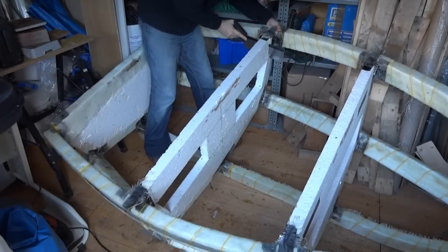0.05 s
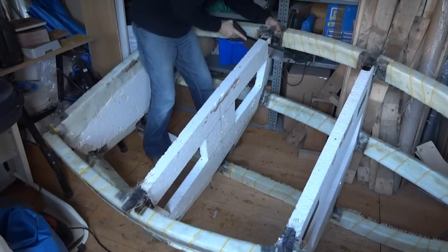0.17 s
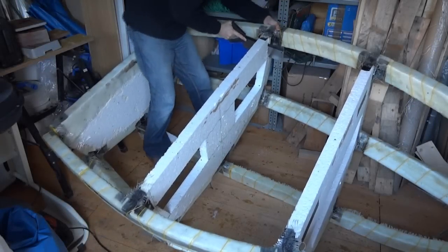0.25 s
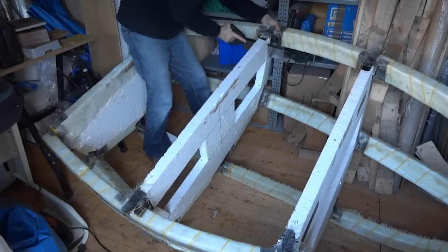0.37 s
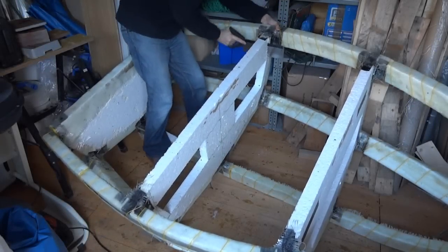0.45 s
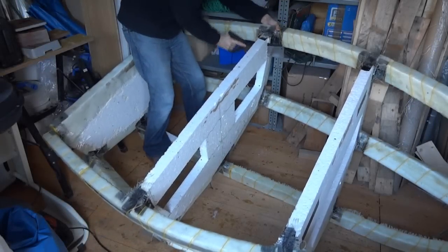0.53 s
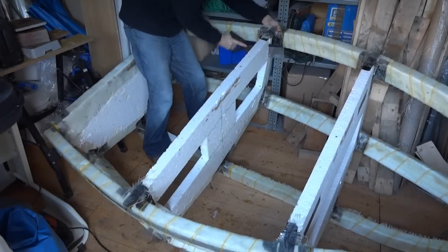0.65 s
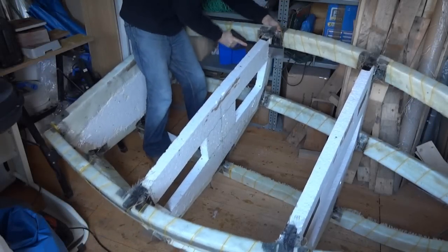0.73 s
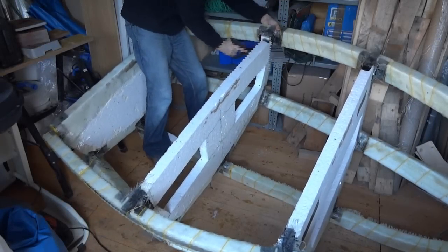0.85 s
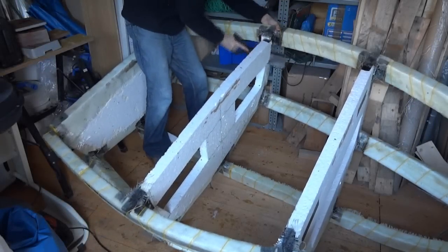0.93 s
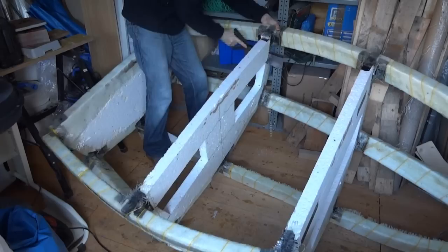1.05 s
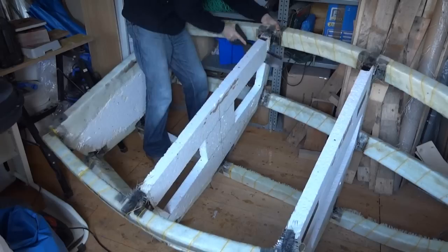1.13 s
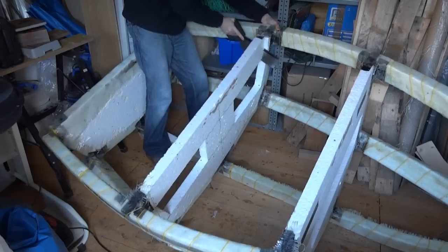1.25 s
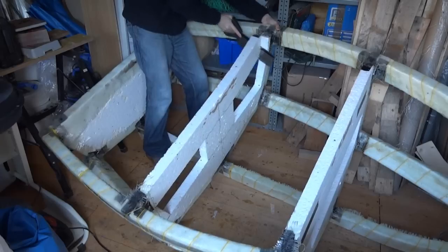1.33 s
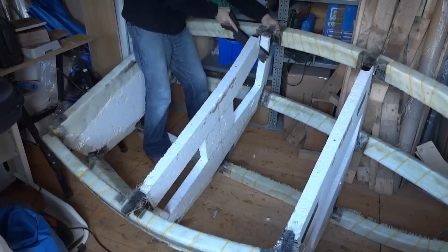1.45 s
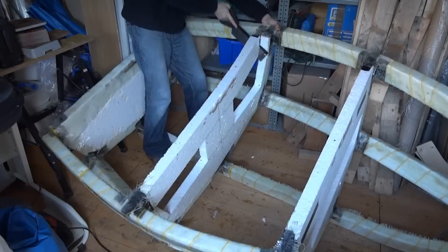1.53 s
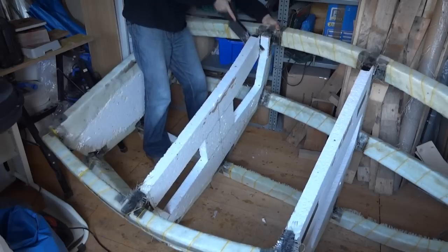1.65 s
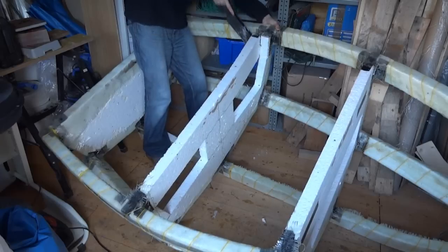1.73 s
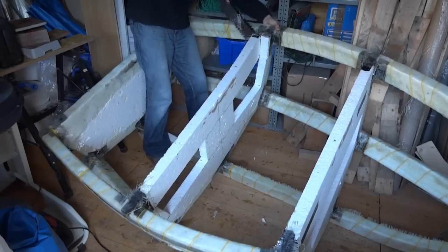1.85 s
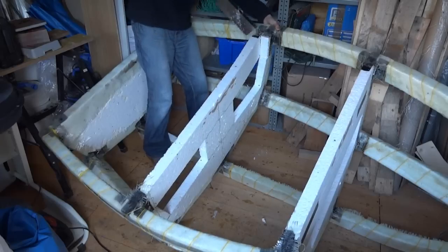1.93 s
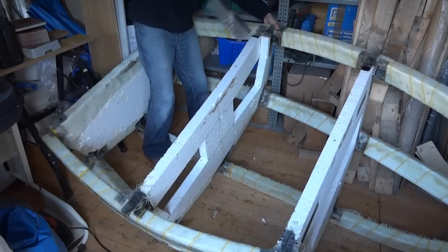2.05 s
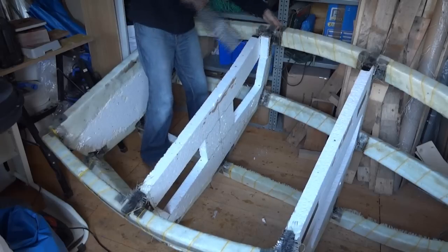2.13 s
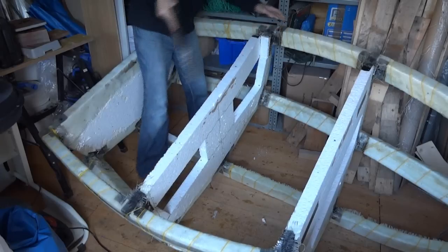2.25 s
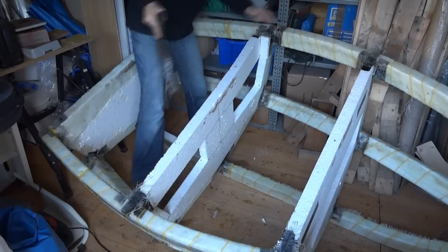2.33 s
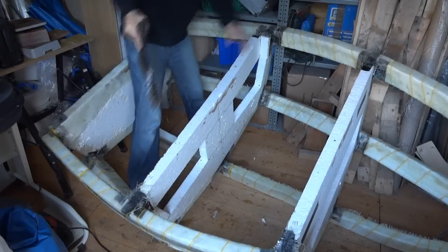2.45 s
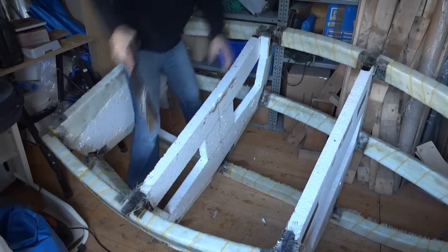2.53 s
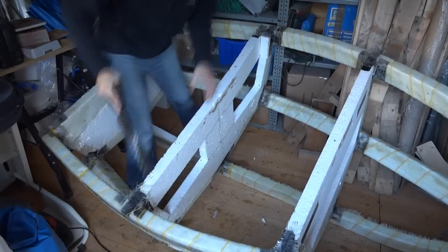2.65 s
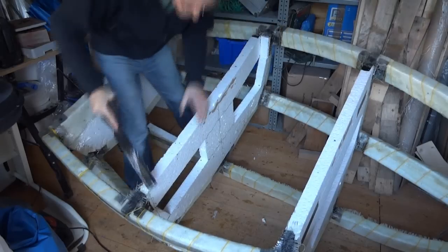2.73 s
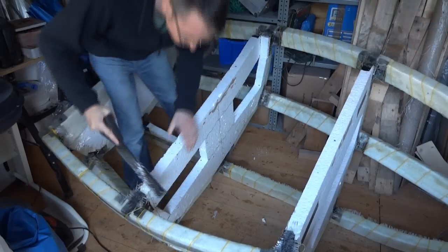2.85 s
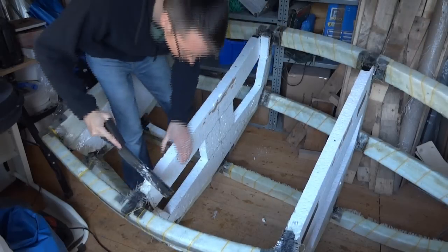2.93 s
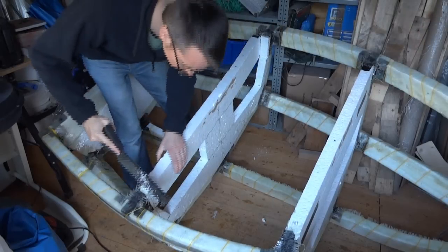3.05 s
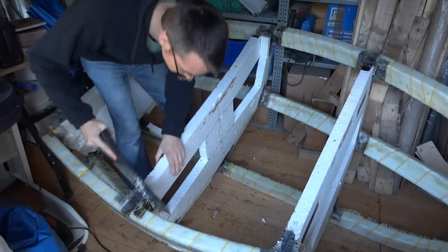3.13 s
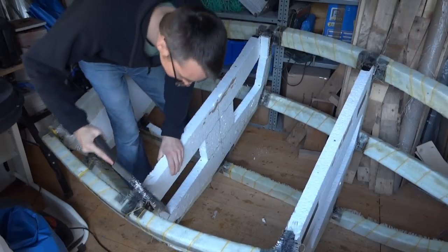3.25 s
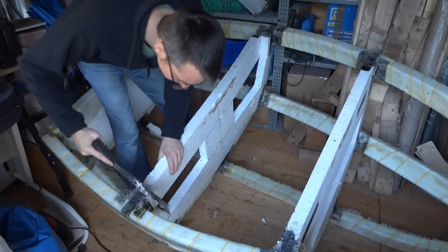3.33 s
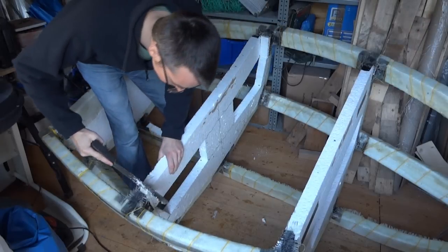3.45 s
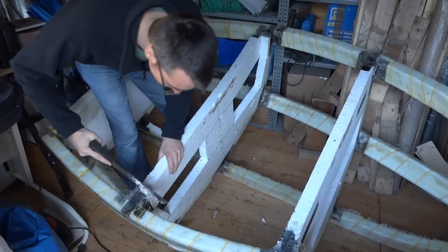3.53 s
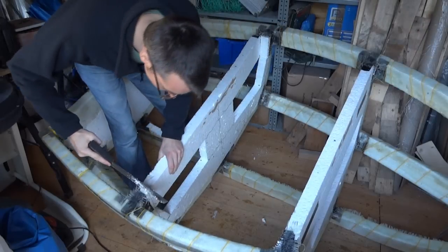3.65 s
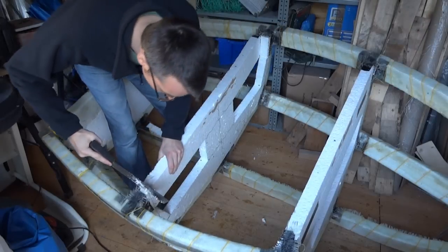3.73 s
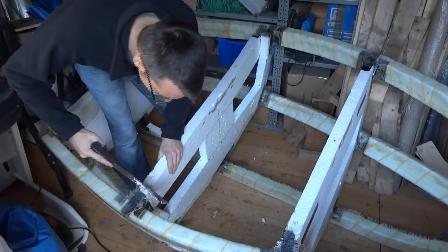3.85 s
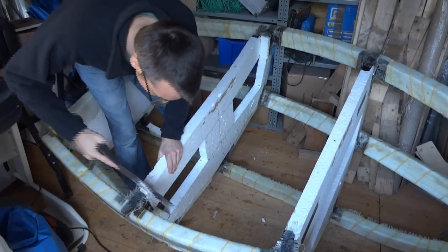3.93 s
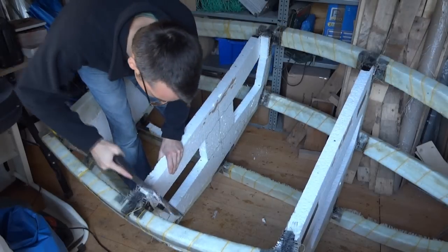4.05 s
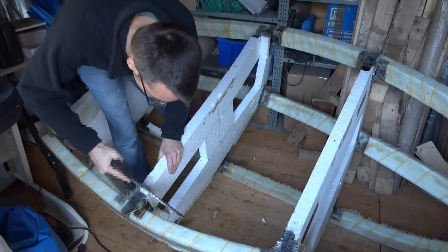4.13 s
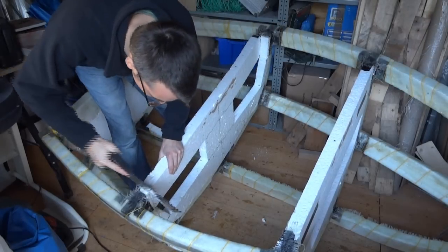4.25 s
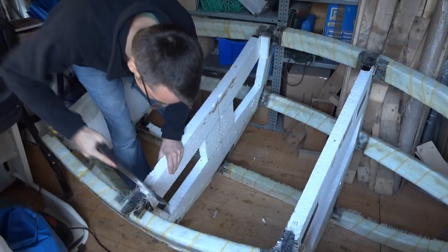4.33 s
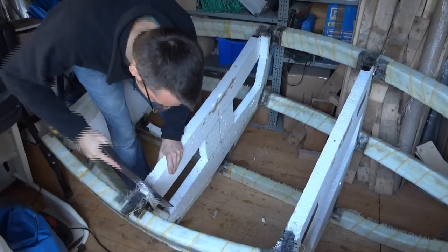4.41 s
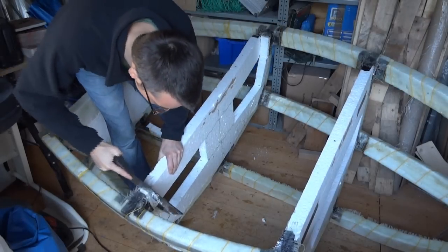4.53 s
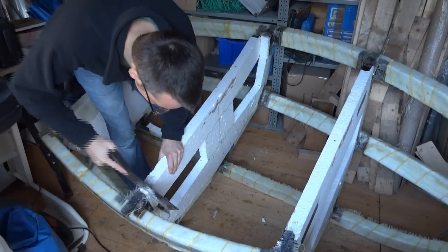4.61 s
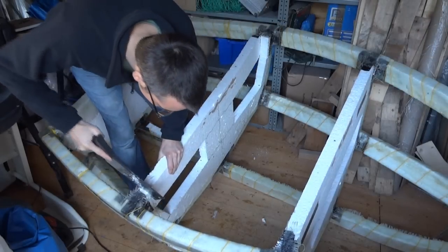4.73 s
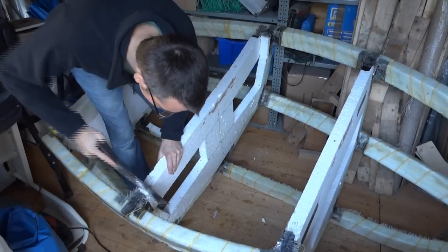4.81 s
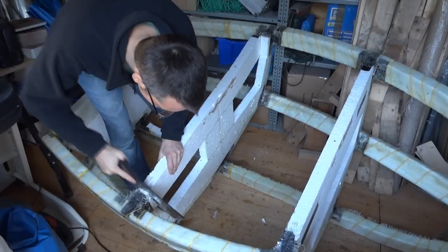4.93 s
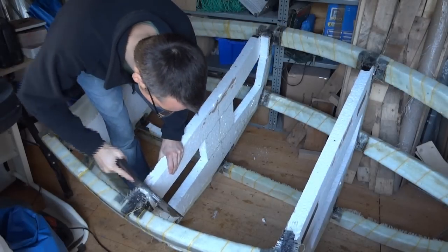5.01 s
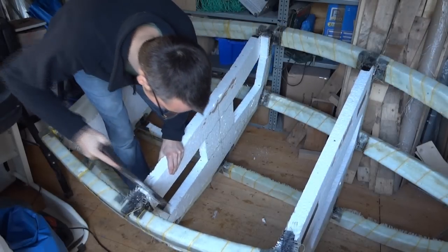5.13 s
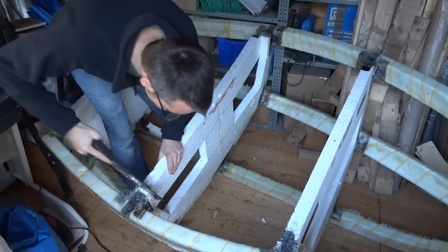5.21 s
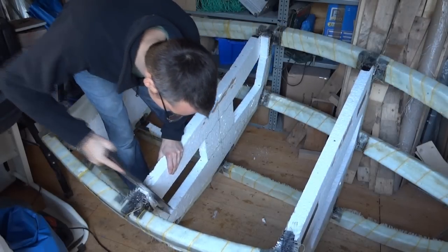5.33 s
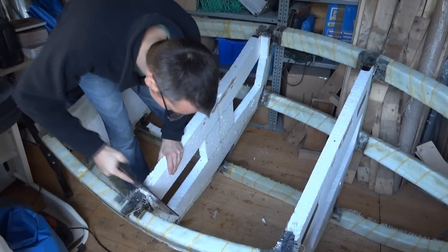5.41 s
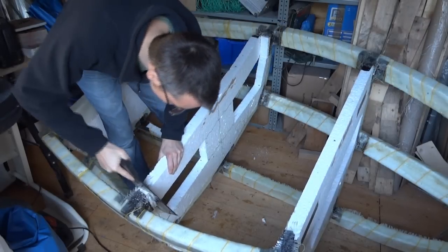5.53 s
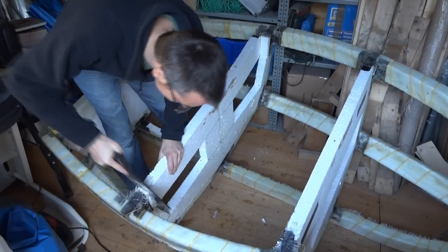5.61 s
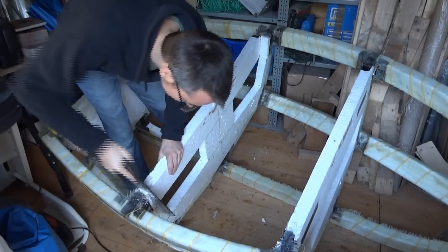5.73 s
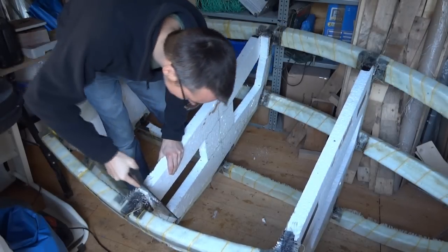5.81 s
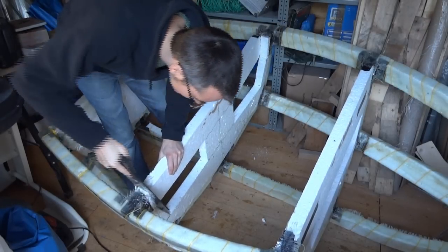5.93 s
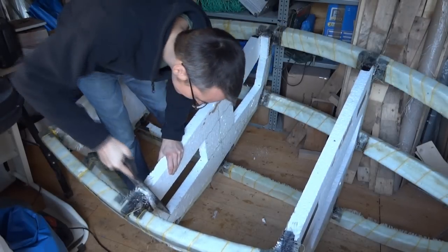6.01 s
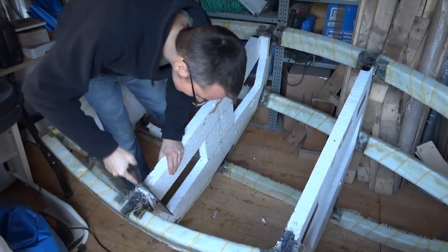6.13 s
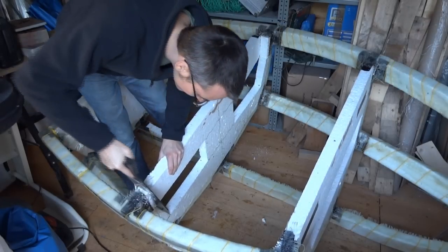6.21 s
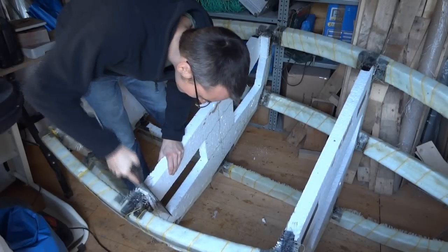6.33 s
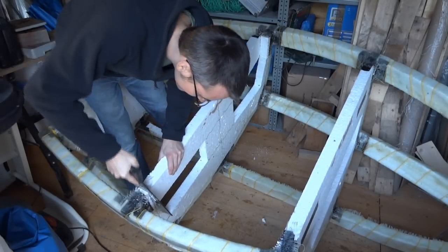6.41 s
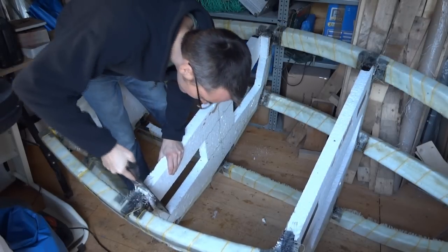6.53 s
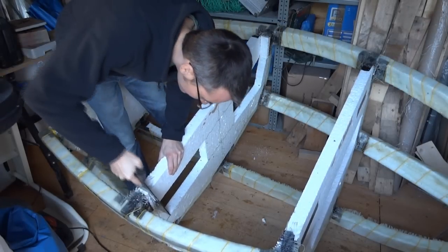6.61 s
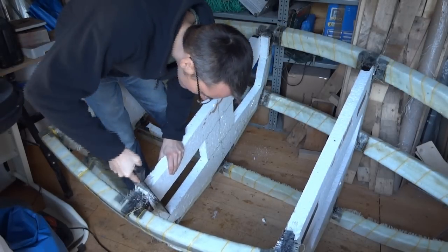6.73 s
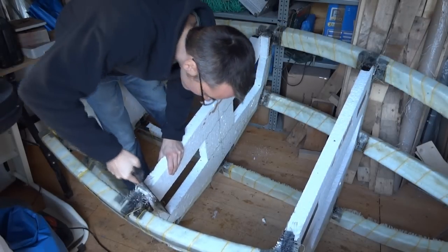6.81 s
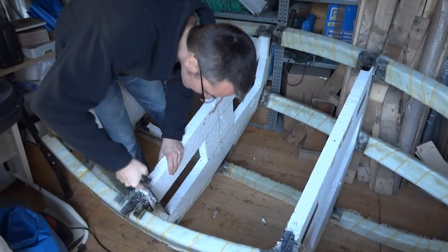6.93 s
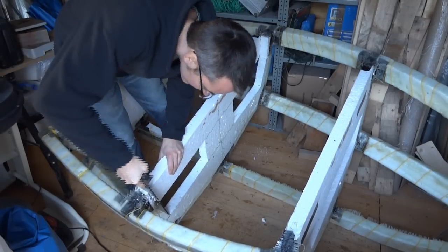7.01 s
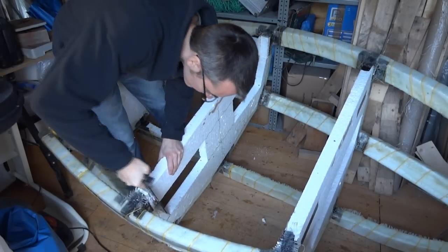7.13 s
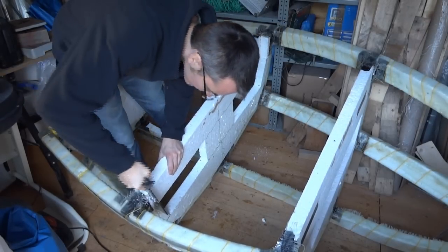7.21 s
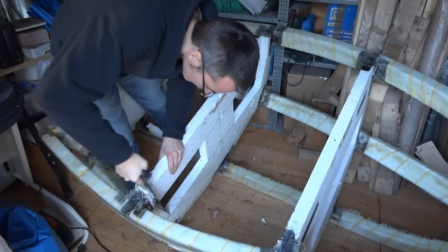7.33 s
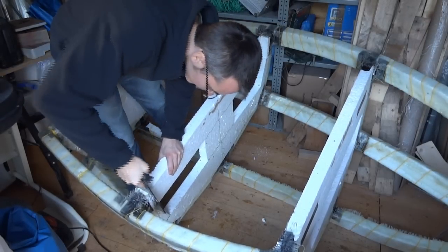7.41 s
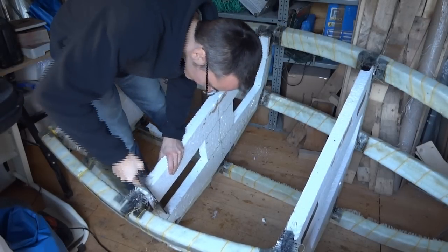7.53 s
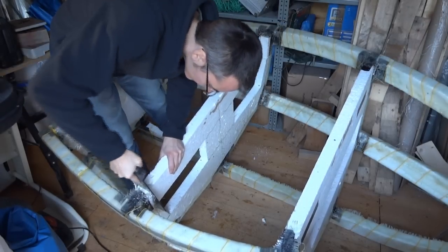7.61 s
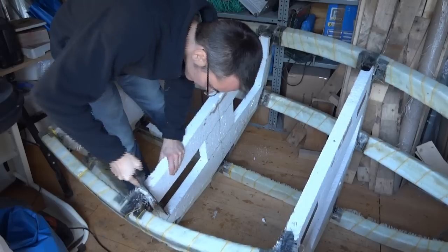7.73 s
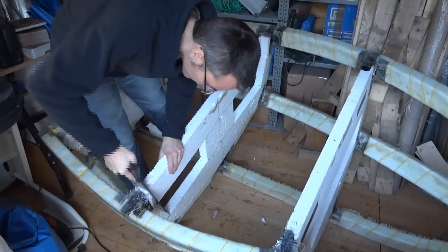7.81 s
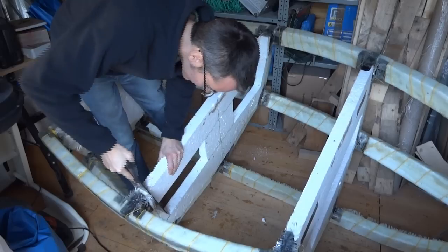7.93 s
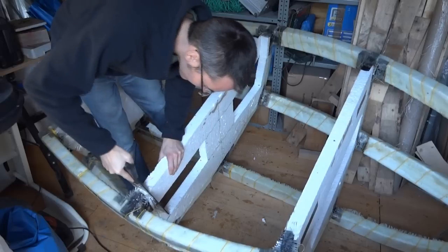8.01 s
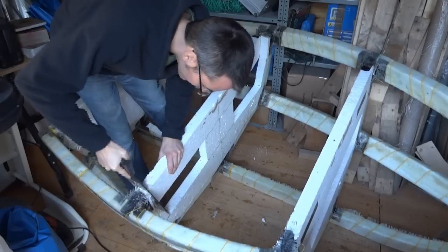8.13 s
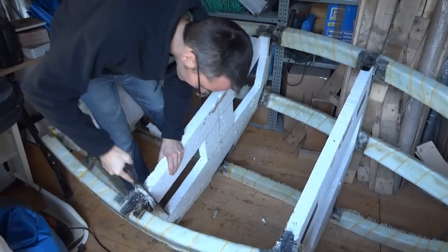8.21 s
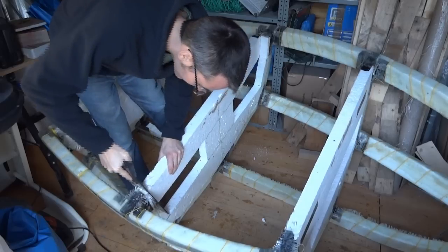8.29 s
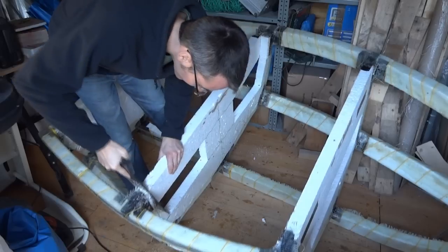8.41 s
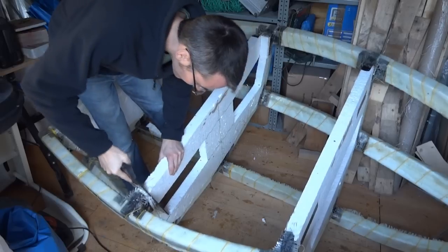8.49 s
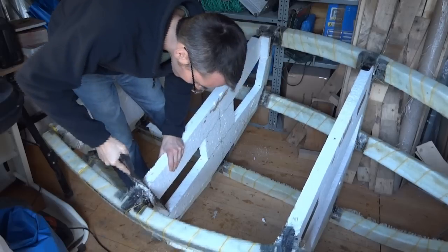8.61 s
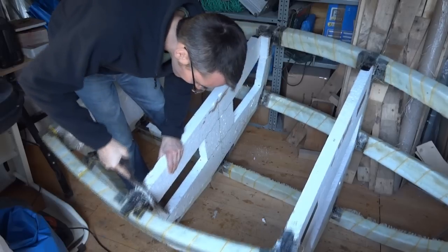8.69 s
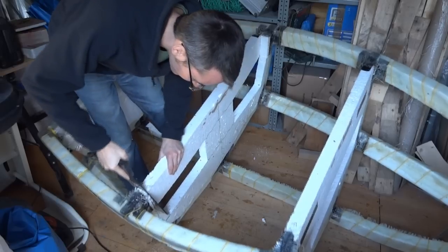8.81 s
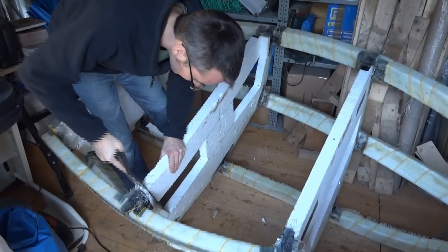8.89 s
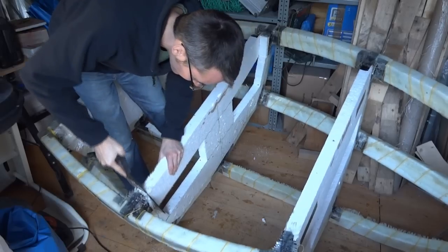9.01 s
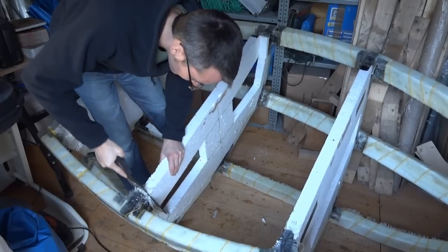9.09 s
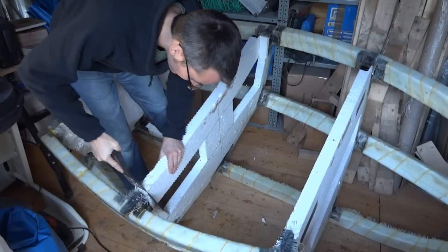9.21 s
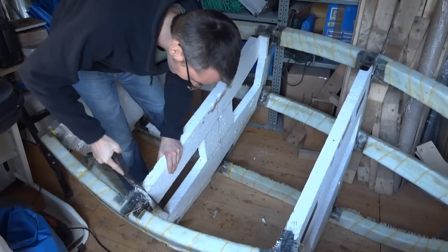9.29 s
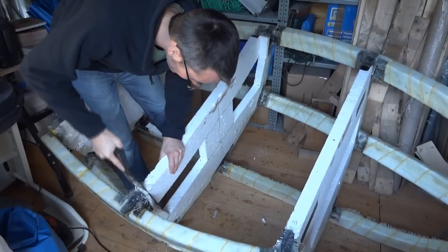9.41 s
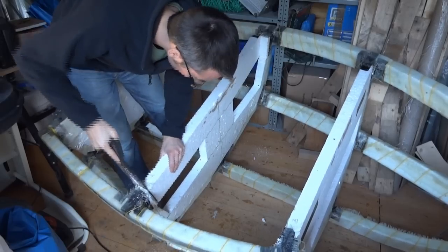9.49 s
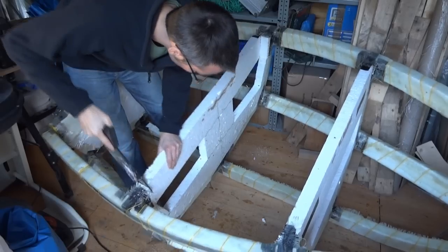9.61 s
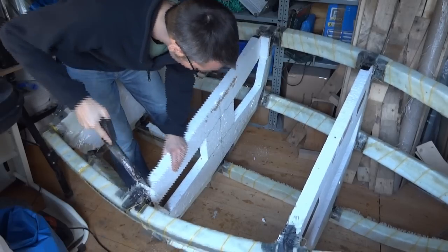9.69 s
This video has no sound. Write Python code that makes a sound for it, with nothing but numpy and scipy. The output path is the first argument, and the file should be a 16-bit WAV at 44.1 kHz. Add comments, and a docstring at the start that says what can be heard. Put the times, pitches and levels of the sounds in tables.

```python
"""Hand saw in polystyrene foam

A hand saw cuts a foam panel in a cluttered wooden workshop. Clicks of torn beads, shaped in third octaves by
the stroke force, make the rasp; jolts ring modes of panel and blade; gliding tones make squeaks, groans and low
thumps. Between two cuts someone steps along the frame and sets the saw down on the foam: brief bursts of the
same rasp and drumming, with dry cracks of noise. Echoing delays make the room, shaped noise its faint hum and
hiss."""
import sys
import numpy as np
from scipy import signal
from scipy.fft import rfft, irfft, next_fast_len
from scipy.io import wavfile

SR = 44100
rng = np.random.default_rng(int(sys.argv[2]) if len(sys.argv) > 2 else 0)


def master(y):
    """Save y as 16-bit WAV."""
    cut = np.clip(np.atleast_2d(y).T, -1, 1)
    pcm = np.round(cut * 32767)  # scale
    wavfile.write(sys.argv[1], SR, pcm.astype(np.int16))


def level_to_linear(level):
    """Convert decibel levels to linear amplitude factors, elementwise."""
    exponent = np.asarray(level, float) / 20
    return 10 ** exponent


N = 429975

FIRST_CUT_END_S = 1.406   # the teeth leave the foam


def rms_one(x):
    """Scale to rms 1."""
    return x / np.sqrt(np.mean(x ** 2) + 1e-20)


def at_hz(points, hz):
    """Read a spectrum on a log-frequency axis."""
    points_hz, values = np.transpose(points)
    return np.interp(np.log(hz), np.log(points_hz), values)


def drift(rate):
    """Slow chance with spread 1: noise through a two-pole lowpass, run at SR / 40."""
    r = np.exp(-80 * np.pi * rate / SR)
    noise = rng.standard_normal(N // 40 + 2002)
    slow = signal.lfilter([1], [1, -2 * r, r * r], noise)[2000:]   # settled part
    return np.interp(np.arange(N) / 40, np.arange(len(slow)), rms_one(slow))


def resonance(x, hz, width_hz):
    """One two-pole resonance."""
    r = np.exp(-np.pi * width_hz / SR)
    return signal.lfilter([1, 0, -1], [1, -2 * r * np.cos(2 * np.pi * hz / SR), r * r], x)


def beads(mean_per_s, spread_db):
    """Beads tear loose as clicks of uneven size, in clumps as the teeth catch, over a bed of noise."""
    sizes = level_to_linear(spread_db * np.minimum(rng.exponential(1, N), 5)) * rng.choice([-1, 1], N)
    chance = mean_per_s * level_to_linear(2.5 * drift(90)) / SR
    return sizes * (rng.random(N) < chance) + 0.27 * rng.standard_normal(N)


def air():
    """Quiet workshop air and microphone hiss: shaped noise, nearly alike on both sides."""
    # air spectrum, relative power density: hz, level_db
    air_spectrum = [(25, -13), (87, 2.5), (114, -7), (236, -3), (3600, -28), (4610, -22), (5400, -29),
                    (13600, -33.5), (16000, -42)]
    hz = np.maximum(np.arange(N // 2 + 1) * SR / N, 10)
    spectrum = rfft(rng.standard_normal((2, N))) * level_to_linear(at_hz(air_spectrum, hz))
    mid, side = irfft(spectrum, N)
    return level_to_linear(-51) * rms_one(mid + level_to_linear(-10) * side * np.array([[1], [-1]]))


def room(x):
    """Ten feedback delays a side, duller on every round."""
    low_t60_s, wall_cut_hz = 0.11, 17000
    size = next_fast_len(N + SR)
    hz = np.arange(size // 2 + 1) * SR / size
    t60_s = low_t60_s / np.sqrt(1 + (hz / wall_cut_hz) ** 2)
    spectrum, response = rfft(x, size), np.zeros((2, len(hz)), complex)
    for k, lag_s in enumerate(rng.uniform(0.0082, 0.044, 20)):
        echo = level_to_linear(-60 * lag_s / t60_s) * np.exp(-2j * np.pi * hz * lag_s)
        response[k % 2] += (-1) ** (k // 2) * echo / (1 - echo)
    return irfft(spectrum * response, size)[:, :N] / np.sqrt(10)


def strokes(drum_dip_share):
    """Each stroke bites, holds and eases off into the next turn; harder strokes gain rasp more than treble."""
    # saw strokes, each lasting until the next: start_s, turn_dip_db, rise_s, rasp_db
    stroke_rows = [(0.0, 9, .003, -30), (.091, -12.5, .012, -34), (0.14, -11, .01, -36),
                   (.305, -8, .035, -21), (.396, -5, .12, -18.5), (.69, -12, .025, -35),
                   (.785, -11.5, 0.065, -23.5), (1.098, -10, .03, -23.5), (3.967, -15, .004, -14),
                   (4.263, -25.5, 0.0046, -19), (4.323, -9, 0.023, -13.5), (4.438, -7.5, 0.0035, -14.5),
                   (4.652, -8, 0.0023, -27), (4.831, -10.5, .014, -13.5), (5.057, -12, .011, -17.5),
                   (5.226, -16, .008, -33), (5.299, -12, .003, -27), (5.386, -3, 0.017, -17.5),
                   (5.563, -17, .025, -22), (5.63, -6, 0.003, -12.5), (5.724, -20.5, .042, -16.5),
                   (5.899, -11.5, 0.026, -22), (6.068, -5.5, 0.04, -15.5), (6.203, -13, 0.054, -22),
                   (6.356, -8, 0.027, -15.5), (6.475, -12.5, 0.043, -24), (6.617, -7, 0.047, -17.5),
                   (6.749, -12.5, 0.04, -21), (6.907, -9, 0.063, -19), (7.047, -16, 0.016, -24),
                   (7.178, -12.5, 0.031, -25), (7.288, -10, .025, -22.5), (7.453, -8, 0.042, -17.5),
                   (7.557, -6.5, 0.0037, -22.5), (7.715, -11, .01, -17.5), (7.84, -7, 0.014, -21.5),
                   (7.961, -8, 0.035, -16), (8.113, -9.5, 0.02, -16), (8.217, -9.5, 0.02, -15.5),
                   (8.353, -7, 0.0037, -23.5), (8.464, -9, 0.023, -13), (8.609, -8, 0.016, -18.5),
                   (8.722, -14.5, .004, -17.5), (8.884, -13, .005, -17.5), (9.036, -6, 0.0089, -16),
                   (9.165, -11, .0065, -22), (9.312, -9.5, 0.011, -21.5), (9.41, -16.5, 0.034, -18),
                   (9.485, 2, .004, -27.5), (9.69, -7, .034, -27.5)]
    # levels at the usual rasp as the cut moves on: time_s, treble_db, drum_db
    colour = [(0, -26, -31), (.25, -28, -33.5), (.45, -15, -39.5), (.7, -24, -31), (.8, -14.5, -31),
              (4.0, -21.5, -34), (4.35, -24.5, -28.5), (4.6, -19.5, -38.5), (5.3, -22, -33),
              (5.7, -19.5, -37.5), (6.3, -18, -32), (7.0, -17.5, -35.5), (7.45, -18.5, -29),
              (8.3, -19.5, -32.5), (8.8, -19.5, -27.5), (9.15, -21, -27.5), (9.4, -18.5, -38.5)]
    usual_rasp_db = -20
    treble_follows, drum_follows = 0.32, 0.84   # share of a stroke's dB above the usual rasp
    fall_s, fall_s_per_rasp_db, fall_s_per_dip_db = .04, .002, .002
    pause_from_s, pause_to_s, pause_db = .185, .3, -14   # the saw hesitates

    t = np.arange(N) / SR
    start_s, dip_db, rise_s, rasp_db = np.transpose(stroke_rows)
    when_s, treble_db, drum_db = np.transpose(colour)
    next_s = np.append(start_s[1:], 0)
    last = (start_s < FIRST_CUT_END_S) & (next_s > FIRST_CUT_END_S)   # of the first cut
    end_s = np.where(last, FIRST_CUT_END_S, np.append(start_s[1:], N / SR))
    next_dip_db = np.where(last, 0, np.append(dip_db[1:], 0))
    extra_db = rasp_db - usual_rasp_db

    # longer fall after a harder stroke and before a deeper dip
    fall = fall_s + fall_s_per_rasp_db * extra_db - fall_s_per_dip_db * next_dip_db
    fall = np.clip(fall, .005, end_s - start_s - rise_s)
    corners_s = np.transpose([start_s, start_s + rise_s, end_s - fall, end_s - .004]).ravel()
    corners_s = np.maximum.accumulate(corners_s)
    resting = (t > FIRST_CUT_END_S) & (t < start_s[np.argmax(last) + 1])

    stroke_drum_db = np.interp(start_s, when_s, drum_db) + drum_follows * extra_db
    stroke_treble_db = np.interp(start_s, when_s, treble_db) + treble_follows * extra_db
    force = []
    for level_db, share in [(stroke_drum_db, drum_dip_share), (rasp_db, 1), (stroke_treble_db, 1)]:
        turn_in_db, turn_out_db = level_db + share * dip_db, level_db + share * next_dip_db
        corners_db = np.transpose([turn_in_db, level_db, level_db, turn_out_db]).ravel()
        force.append(level_to_linear(np.interp(t, corners_s, corners_db)) * ~resting)

    pause_corners_s = [pause_from_s - .01, pause_from_s + .01, pause_to_s - .01, pause_to_s + .01]
    pause = np.interp(t, pause_corners_s, [0, 1, 1, 0])
    return np.array(force) * level_to_linear(pause_db * pause)


def rasp(force, patchy_db, slow_db):
    """Bead clicks in third octaves; each region of the foam brightens and fades on its own."""
    # share of each third octave in the rasp: hz, level_db
    foam = [(100, -23.5), (300, -12.5), (600, -9), (1000, -6.5), (2000, -9), (4000, -7), (6000, -6.5),
            (10000, -5.5), (13000, -5), (15500, -8.5)]
    # treble tilt above 8 kHz: time_s, tilt_db_per_octave
    top_tilt = [(0, -.5), (4.9, -1), (5.2, 3), (6.2, 3), (7.0, 1), (8.3, -1)]
    snaps = 0.24 * beads(260, spread_db=5.0)    # a few larger tears sound in all bands at once
    trains = [rms_one(beads(9000, spread_db=spread_db)) + snaps for spread_db in (3.0, 1.5)]
    edges_hz = 45 * 2 ** (np.arange(27) / 3)
    tilt_db = np.interp(np.arange(N) / SR, *np.transpose(top_tilt))
    log_force = np.log(force + 1e-6)
    out, shared = 0, drift(7)
    for k, (low_hz, high_hz) in enumerate(zip(edges_hz, edges_hz[1:])):
        band_filter = signal.butter(2, [low_hz, high_hz], "band", fs=SR, output="sos")
        band = rms_one(signal.sosfilt(band_filter, trains[k % 2]))
        hz = np.sqrt(low_hz * high_hz)
        # 0 drum, 1 rasp, 2 treble
        place = at_hz([(400, 0), (1500, 0.63), (3200, 1.36), (7000, 2.0)], hz)
        lower = min(int(place), 1)
        level = np.exp((lower + 1 - place) * log_force[lower] + (place - lower) * log_force[lower + 1])
        shared = 0.69 * shared + 1.94 * drift(7.9)    # neighbours wander partly together
        wander_db = slow_db * shared + patchy_db * drift(25)
        colour_db = at_hz(foam, hz) + tilt_db * max(np.log2(hz / 8000), 0)
        out = out + band * level * level_to_linear(colour_db + wander_db)
    return out


def ringing(force, modes, uneven_db):
    """The jolts of the teeth set bending modes ringing, each by a changing amount."""
    jolts, out = beads(600, spread_db=4.0), 0
    for hz, width_hz, level_db in modes:
        drive = jolts * force * level_to_linear(uneven_db * drift(6.6))
        usual = np.std(resonance(jolts, hz, width_hz))
        out = out + level_to_linear(level_db) * resonance(drive, hz, width_hz) / usual
    return out


def panel_drum(force):
    """Low modes of panel and frame drum under the teeth."""
    # panel and frame modes: hz, width_hz, level_db
    panel_modes = [(158, 19, -14), (232, 40, -5.5), (340, 69, -8), (535.5, 77, -10)]
    return ringing(force, panel_modes, uneven_db=4.0)


def blade_ring(force):
    """Bending modes of the steel blade, all equally wide."""
    # blade modes: hz, level_db
    blade_modes = [(880, -20.5), (2040, -13), (3500, -20), (4800, -31), (5900, -18), (7020, -21)]
    width_hz = 130
    return ringing(force, [(hz, width_hz, level_db) for hz, level_db in blade_modes], uneven_db=5.0)


def squeaks(rows, wander=.038, scoop=.08, flutter_db=5.5, octave_db=-4):
    """Tone and octave scoop up to pitch; gliding ones are rough: they wander and split into three voices."""
    out, slips = np.zeros(N), [drift(70) for voice in range(3)]
    flutter = level_to_linear(flutter_db * np.array([drift(150) for voice in range(3)]))
    for start_s, length_s, first_hz, last_hz, level_db in rows:
        start = round(start_s * SR)
        span = slice(start, min(start + round(length_s * SR), N))
        u = np.linspace(0, 1, span.stop - start)
        rough = min(.45 + 4 * abs(np.log(last_hz / first_hz)), 1)
        hz = (first_hz + (last_hz - first_hz) * u) * (1 - scoop * np.exp(-11.0 * u))
        swell = level_to_linear(level_db) * np.sin(np.pi * u ** 0.6) ** 0.84
        octave = level_to_linear(octave_db) * rough * (hz < 7500)
        for voice, (detune, share) in enumerate([(0, 1.0), (-0.046, rough ** 2), (.05, rough ** 2)]):
            bend = 1 + detune + wander * rough ** 2 * slips[voice][span]
            phase = 2 * np.pi * np.cumsum(hz * bend) / SR
            tone = np.sin(phase) + octave * np.sin(2 * phase)
            out[span] += share * swell * flutter[voice, span] ** np.sqrt(rough) * tone
    return out


def chatter(force, mean_per_s):
    """Countless brief squeaks at chance times and pitches, nearly level, scaled by the cutting force."""
    draw = rng.random((round(mean_per_s * N / SR), 4))
    start_s = draw[:, 0] * (N / SR - .1)
    length_s = 0.022 + 0.048 * draw[:, 3]
    first_hz = 1000 * 11.0 ** draw[:, 1]
    last_hz = first_hz * (.99 + 0.031 * draw[:, 2])
    rows = np.transpose([start_s, length_s, first_hz, last_hz, -8.0 * draw[:, 2]])
    return level_to_linear(-6) * force * squeaks(rows, wander=.02, scoop=.025, flutter_db=3.5)


def ticks():
    """Dry cracks and faint crackles of cloth and crumbs: bright noise bursts, 60 dB down in t60_s."""
    # lone cracks: start_s, level_db
    cracks = [(1.909, -25), (2.483, -21), (3.328, -38), (5.107, -12), (7.303, -3), (8.723, -10)]
    rustles_per_s, rustle_db, t60_s = 30, -49, .008
    out, age_s = np.zeros(N), np.arange(600) / SR
    draw = rng.random((round(rustles_per_s * N / SR), 2))
    rustles = [(when * (N - 600) / SR, rustle_db + 7.0 * np.log(size)) for when, size in draw]
    rows = cracks + rustles
    for (start_s, level_db), signs in zip(rows, rng.choice([-1, 1], (len(rows), 600))):
        start = round(start_s * SR)
        out[start:start + 600] += level_to_linear(level_db - 60 * age_s / t60_s) * signs
    return signal.sosfilt(signal.butter(2, 1500, "high", fs=SR, output="sos"), out)


def blade_squeaks():
    """Stick-slip squeaks of the blade flat against the cut."""
    # squeaks: start_s, length_s, first_hz, last_hz, level_db
    squeak_rows = [(.5, .16, 2200, 4200, -26), (1.468, 0.12, 3800, 3510, -18.5),
                   (1.581, 0.096, 5150, 6420, -20), (1.665, 0.14, 5050, 5550, -16),
                   (1.752, 0.061, 6320, 6200, -11.5), (3.925, .035, 3120, 3120, -37),
                   (6.201, 0.066, 7170, 7180, -20), (6.235, 0.056, 4390, 4300, -16),
                   (6.49, .045, 3800, 4000, -20), (6.52, 0.069, 4270, 4200, -16),
                   (6.77, 0.048, 3400, 3680, -22), (6.8, 0.054, 4180, 4230, -20),
                   (6.955, 0.033, 5840, 6000, -24), (7.056, 0.062, 850, 833, -24.5),
                   (7.1, 0.049, 4050, 4100, -16.5), (7.225, 0.065, 2630, 2580, -25),
                   (7.226, 0.073, 5220, 5170, -20.5), (7.616, 0.043, 3950, 3920, -14.5),
                   (7.883, 0.082, 1670, 1590, -18.5), (7.991, 0.12, 1390, 1370, -18),
                   (8.148, 0.057, 3960, 3960, -14.5), (8.238, .044, 5040, 5080, -17.5),
                   (8.266, 0.047, 2650, 2630, -17), (8.362, 0.094, 4090, 4210, -13.5),
                   (8.905, 0.059, 3500, 3410, -17.5), (9.165, .05, 3550, 4200, -19),
                   (9.445, 0.02, 790, 820, -18.5), (9.09, .05, 1940, 1840, -21),
                   (9.46, .04, 9900, 9800, -17), (9.694, .05, 9350, 10300, -25.5),
                   (9.715, .035, 2150, 2320, -20)]
    return squeaks(squeak_rows)


def low_tones():
    """Low thumps and groans of panel, frame and footsteps: squeaks of steady nominal pitch."""
    # low tones: start_s, length_s, pitch_hz, level_db
    low_tone_rows = [(.915, .06, 235, -27), (1.103, .04, 165, -27), (2.51, 0.094, 206, -34),
                     (2.776, 0.087, 229, -30), (4.327, 0.14, 340, -23), (4.846, 0.21, 350, -26),
                     (7.505, .06, 228, -23), (7.795, .06, 228, -25), (7.975, .045, 145, -26),
                     (8.565, .06, 200, -22), (8.89, 0.041, 227, -13.5), (9.06, 0.13, 160, -14)]
    return squeaks([(start_s, length_s, hz, hz, level_db) for start_s, length_s, hz, level_db in low_tone_rows])


def slide_out():
    """Drum, rasp and treble force while the blade is drawn clear of the first cut."""
    # slide levels: after_cut_s, rasp_db, treble_db, drum_db
    slide_rows = [(0, -26.5, -14, -48), (.15, -30, -17, -49.5), (.2, -34.5, -15.5, -41),
                  (.25, -37.5, -16, -40.5), (.27, -30.5, -20.5, -35), (.3, -44, -27, -47.5),
                  (.385, -43, -25, -47), (.405, -32, -26, -40.5), (.45, -45, -42, -52), (.5, -64, -54, -60)]
    after_s, rasp_db, treble_db, drum_db = np.transpose(slide_rows)
    s = after_s + FIRST_CUT_END_S
    t = np.arange(N) / SR
    force = np.array([level_to_linear(np.interp(t, s, level_db)) for level_db in (drum_db, rasp_db, treble_db)])
    return force * ((t > s[0]) & (t < s[-1]))


def contacts(rows):
    """Thud, rasp and treble force of brief uneven contacts that swell and die away."""
    force, age_s = np.zeros((3, N)), np.arange(SR // 2) / SR
    for start_s, rasp_db, treble_db, thud_db, rise_s, t60_s in rows:
        start = round(start_s * SR)
        band_rise_s = rise_s + np.array([[.008], [0], [0]])    # lows build up later
        swell = (1 - np.exp(-age_s / band_rise_s)) ** 2
        fade = level_to_linear(rasp_db - 60 * age_s / t60_s)
        force[:, start:start + len(age_s)] += level_to_linear(np.array([[thud_db], [0], [treble_db]])) * fade * swell
    return force * level_to_linear(1.6 * drift(45))


def sudden(rows):
    """Contacts that all start with the same quick rise."""
    rise_s = 0.0019
    return contacts([(*row[:4], rise_s, row[4]) for row in rows])


def saw_touches():
    """Force of the saw touching foam or frame."""
    # touches: start_s, rasp_db, treble_over_rasp_db, thud_over_rasp_db, t60_s
    touch_rows = [(2.009, -43.5, 0, -9, 0.22), (3.203, -47.5, 3.5, -3, 0.36),
                  (3.514, -29.5, -12, 3.5, 0.16), (3.596, -27.5, -12, 1.5, .17),
                  (3.788, -24.5, -12.5, -2, .17), (3.869, -33, 2, 8, .3), (7.301, -15, -12, -20, 0.072)]
    return sudden(touch_rows)


def knocks():
    """Force of knocks on the frame."""
    # knocks: start_s, rasp_db, treble_over_rasp_db, thud_over_rasp_db, t60_s
    knock_rows = [(2.441, -44, -7.5, 9, .6), (2.483, -39, 4.5, 5, .047), (2.772, -41, -11, 8, .4)]
    return sudden(knock_rows)


def scuffs():
    """Force of scuffs against the frame, slower to swell than most knocks."""
    # scuffs: start_s, rasp_db, treble_over_rasp_db, thud_over_rasp_db, rise_s
    scuff_rows = [(2.49, -41, -6.5, 13, 0.021), (2.795, -20.5, -12, 4, 0.026), (3.345, -51, 10, 5, .004)]
    t60_s = 0.19
    return contacts([(*row, t60_s) for row in scuff_rows])


def scene():
    """All sources, direct and through the room."""
    cutting = strokes(drum_dip_share=0.6) + slide_out()
    touching = saw_touches()
    force = cutting + touching + knocks() + scuffs()   # rows: drum, rasp, treble
    saw = rasp(force, patchy_db=1.3, slow_db=.9)
    saw = saw + panel_drum(force[0])
    saw = saw + blade_ring(1.4 * touching[1] + 0.46 * cutting[1])    # the cut damps the blade
    saw = saw + blade_squeaks() + low_tones()
    saw = saw + chatter(cutting[1], mean_per_s=170)
    saw = saw + ticks()
    # nothing sounds below about 40 Hz
    saw = signal.sosfilt(signal.butter(2, 40, "high", fs=SR, output="sos"), saw)
    return saw + level_to_linear(-9) * room(saw) + air()


def roll_off(x):
    """The treble ends steeply here."""
    return signal.sosfilt(signal.butter(12, 16730, fs=SR, output="sos"), x)


def record(dry):
    """Two close microphones: little width, least in the upper bass; peaks are rounded, the top is cut."""
    width_db, narrow_hz, cutoff_hz = 5.8, (62, 470), 16150
    mid, side = (dry[0] + dry[1]) / 2, (dry[0] - dry[1]) / 2
    side = signal.sosfilt(signal.butter(2, narrow_hz, "stop", fs=SR, output="sos"), side)
    side = level_to_linear(width_db) * side
    pair = 0.79 * np.tanh(np.array([mid + side, mid - side]) / 0.98)
    pair = signal.sosfilt(signal.cheby2(14, 50, cutoff_hz, fs=SR, output="sos"), pair)
    return roll_off(pair)


dry = scene()
out = record(dry)
master(out)
```